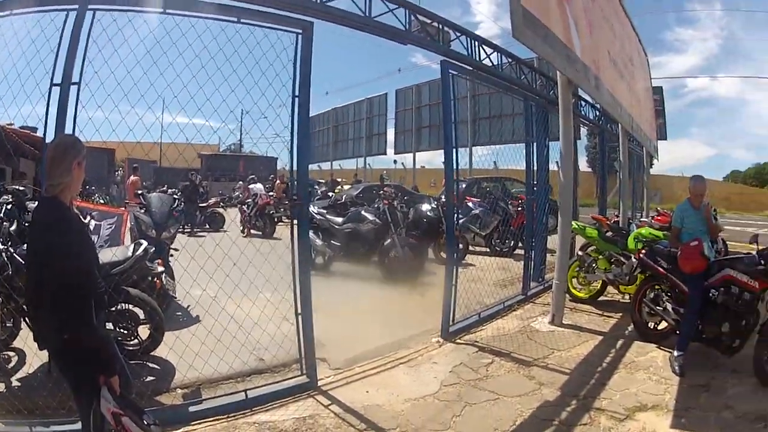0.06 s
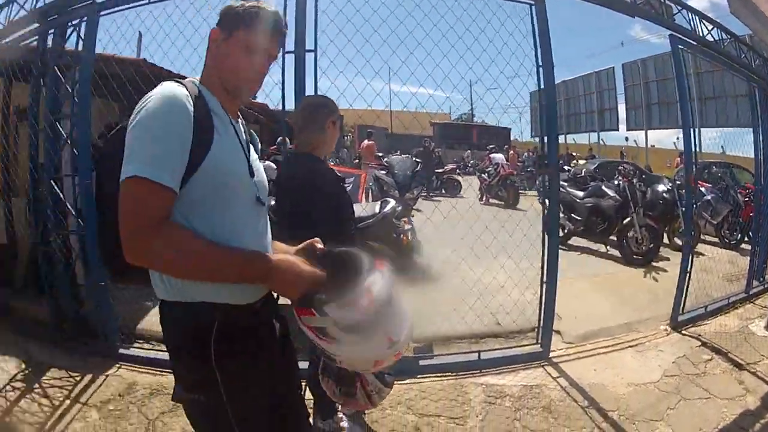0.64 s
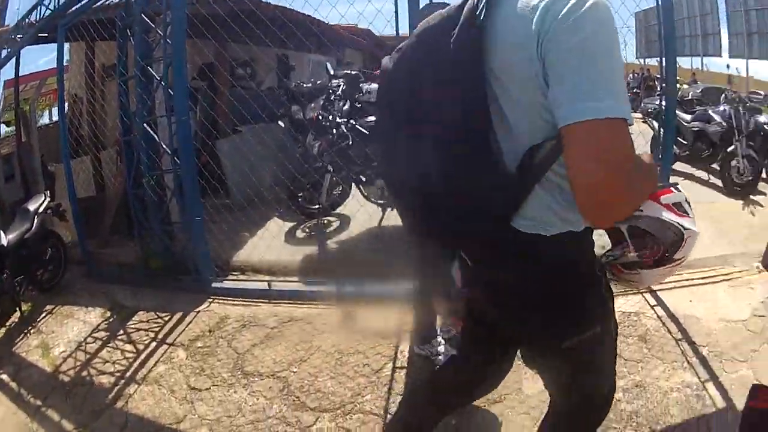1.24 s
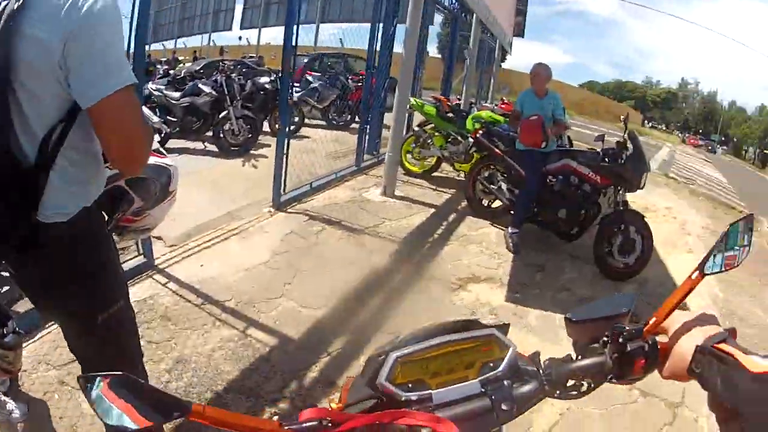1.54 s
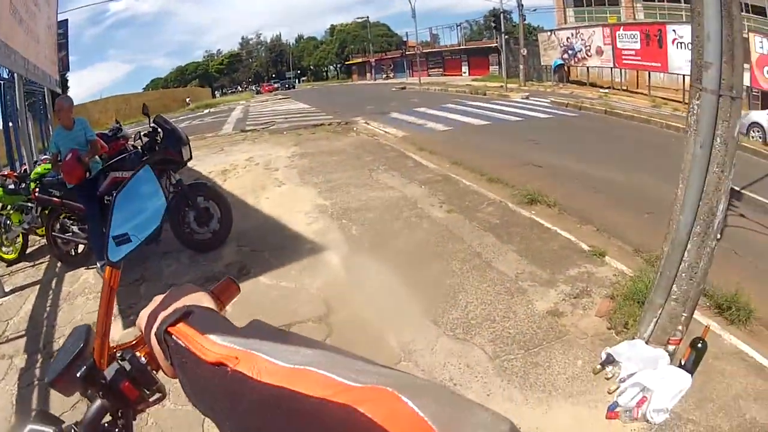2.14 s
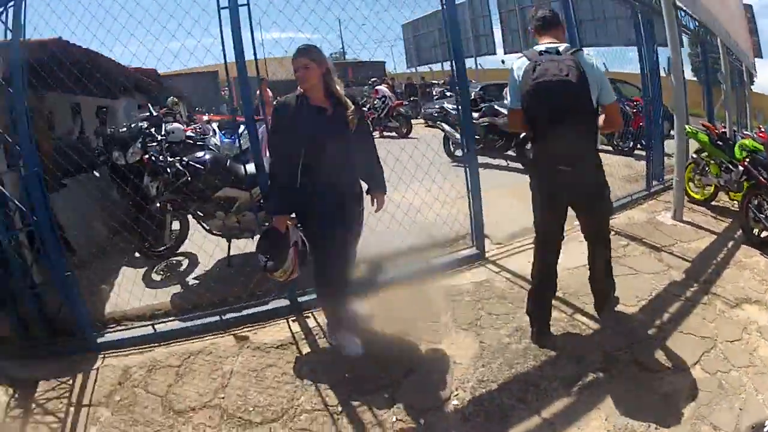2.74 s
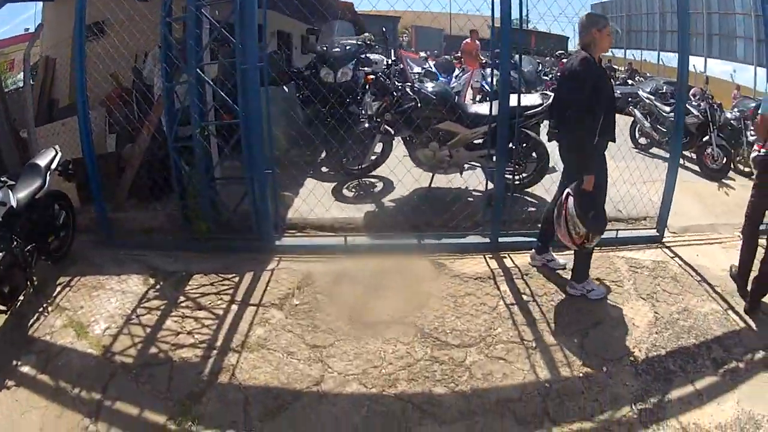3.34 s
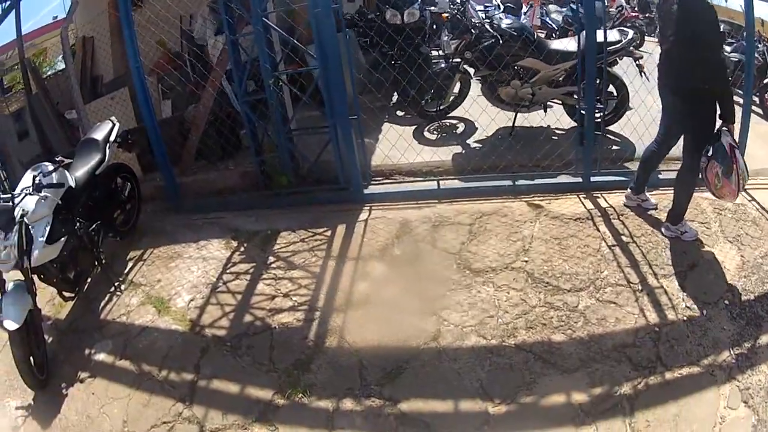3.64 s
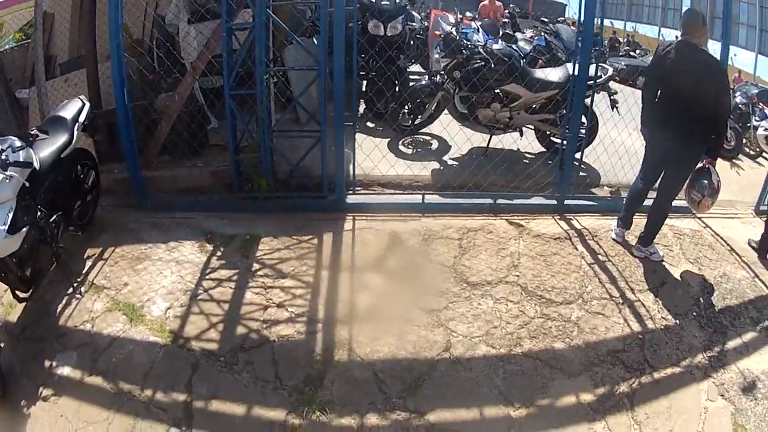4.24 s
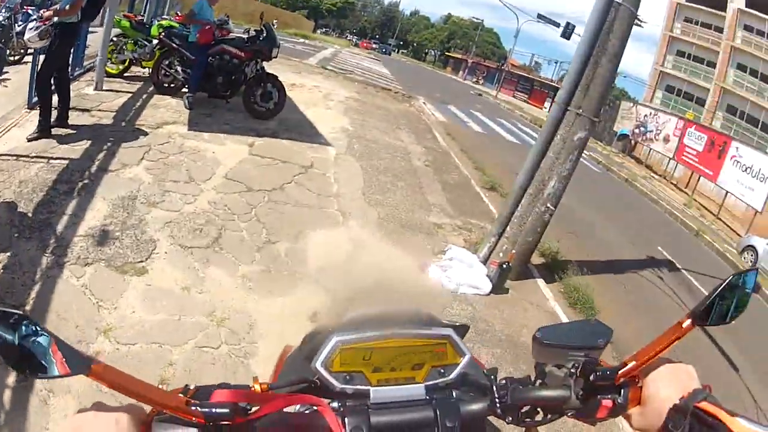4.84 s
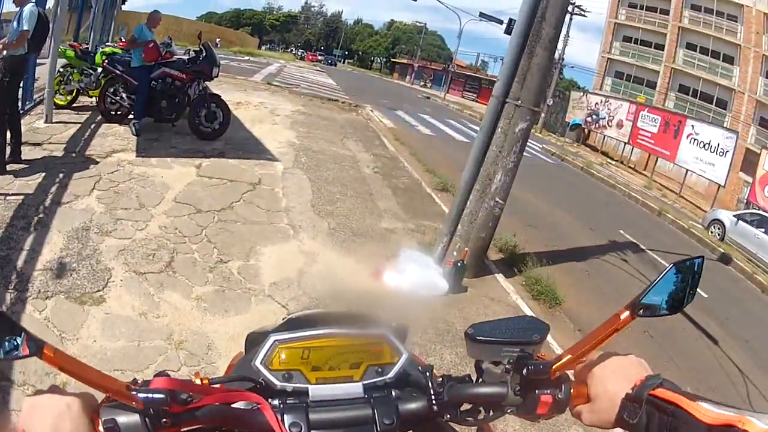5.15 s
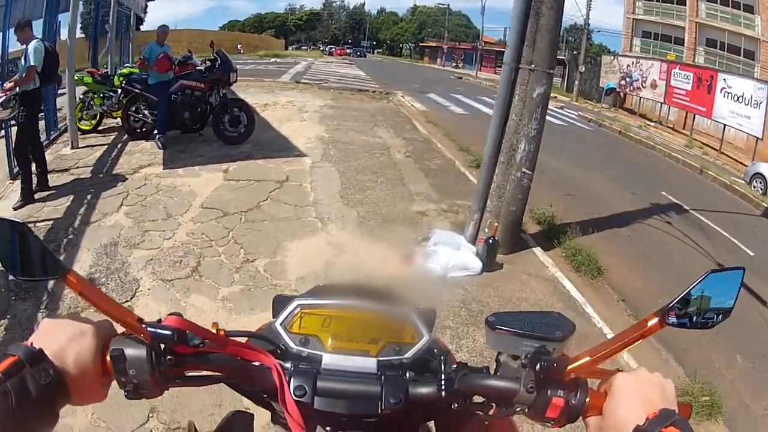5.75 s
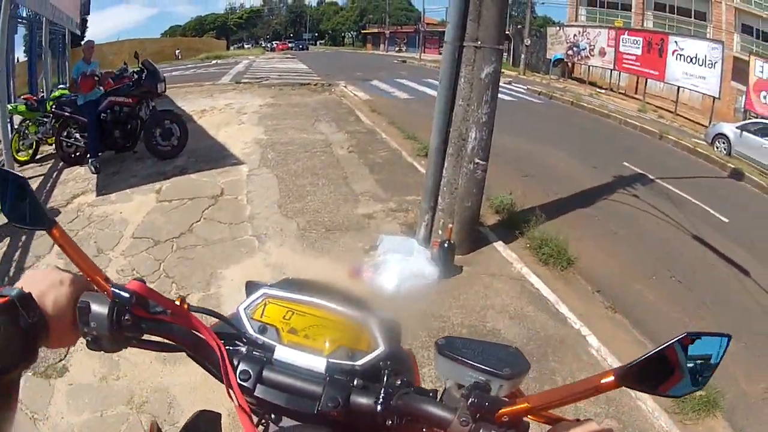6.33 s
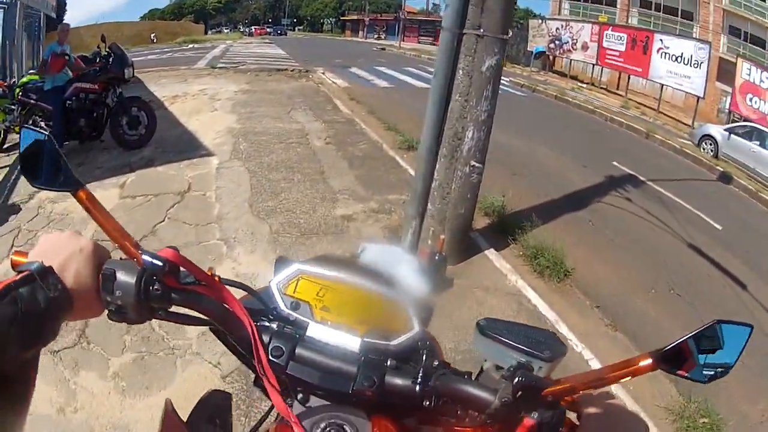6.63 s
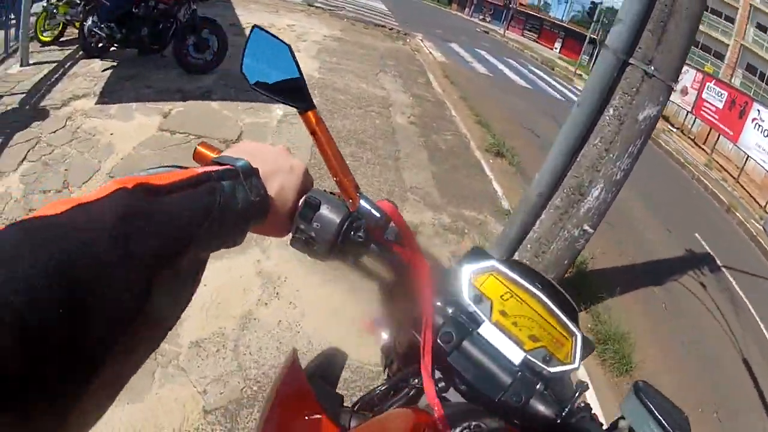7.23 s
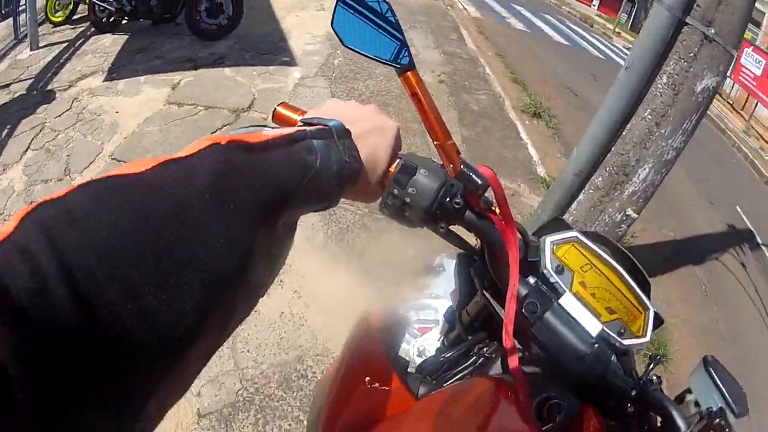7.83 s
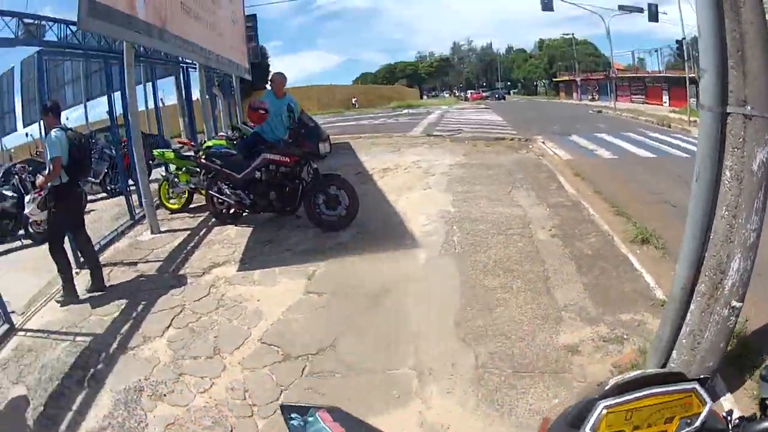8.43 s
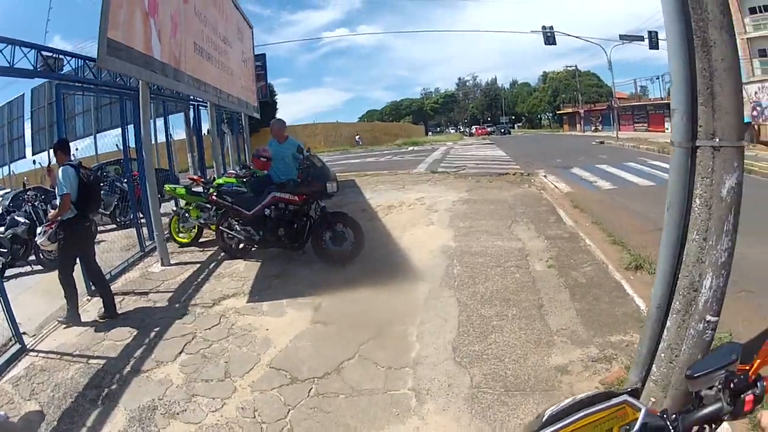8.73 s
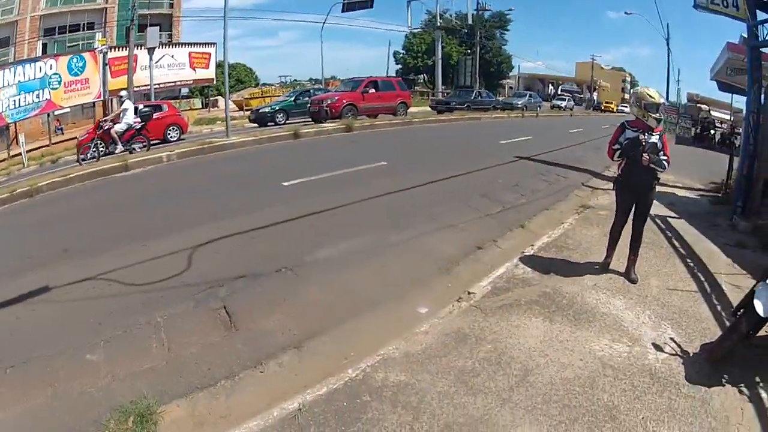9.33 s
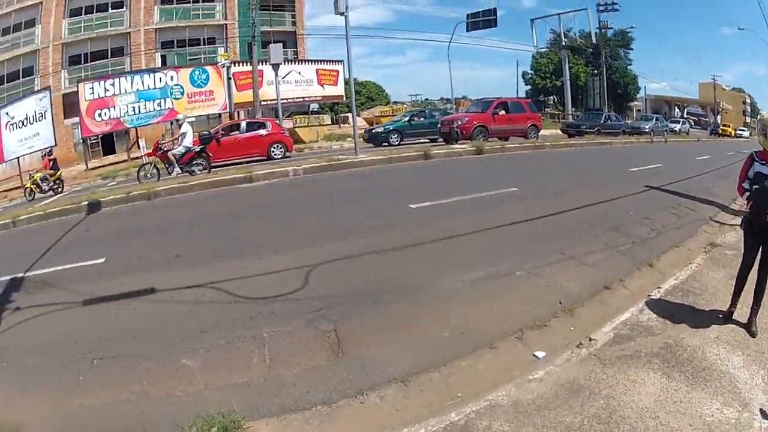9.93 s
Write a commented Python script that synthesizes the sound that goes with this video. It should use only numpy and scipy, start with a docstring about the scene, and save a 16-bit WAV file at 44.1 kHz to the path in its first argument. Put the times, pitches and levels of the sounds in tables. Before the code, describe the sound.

A four-cylinder motorcycle idles loudly with one throttle blip, then scrapes and thumps hit the microphone.

```python
"""An inline-four motorcycle idles through an open exhaust, with one blip of the throttle.
Each firing rings the pipe and drags a puff of gas; cam chain and tappets clatter and hiss.
A second bike hums nearby, under a faint whine. The tone shifts as the rider, who wears a
two-port microphone, looks around, and cloth brushes past it. After the blip something rubs
the microphone housing: it scrapes, thumps and covers the right port."""
import sys
import numpy as np
from scipy import signal
from scipy.fft import rfft, irfft, next_fast_len
from scipy.io import wavfile
from scipy.ndimage import map_coordinates

SR = 44100
rng = np.random.default_rng(int(sys.argv[2]) if len(sys.argv) > 2 else 0)


def master(y):
    """Save y as 16-bit WAV."""
    cut = np.clip(np.atleast_2d(y).T, -1, 1)
    pcm = np.round(cut * 32767)  # scale
    wavfile.write(sys.argv[1], SR, pcm.astype(np.int16))


N = 440118
T = np.arange(N) / SR

# Likeness of the two ports. Each row: frequency in Hz, correlation.
PORT_CORRELATION = [(30, 0.68), (100, 0.45), (400, 0.93), (1200, 0.9), (2500, 0.61), (5000, 0.049),
                    (15000, 0.09)]
# Idle speed. Each row: time in seconds, firings per second.
IDLE_HZ = [(0.0, 39.99), (1.42, 40.61), (1.76, 39.71), (2.98, 38.3), (3.48, 39.36), (3.62, 38.79),
           (3.92, 40.02), (4.54, 40.2), (4.68, 39.25), (5.5, 39.78), (5.68, 38.32), (6.5, 38.28),
           (6.68, 39.22), (7.14, 39.64), (7.24, 38.82), (9.18, 39.73), (9.32, 38.94), (9.98, 39.7)]

# Exhaust layers as the rider moves and looks around. Each row: time in seconds, gain in dB.
BOOM_DB = [(0, -17), (.5, -18), (1.2, -18.5), (1.8, -17.5), (2.5, -17.5), (3.2, -19.5), (4.2, -17.5),
           (5.7, -18), (6.3, -18.5), (6.8, -17), (8.0, -18.5), (8.6, -17), (9.3, -18.5), (9.98, -17.5)]
DRONE_DB = [(0, -18.5), (.35, -20), (1.4, -19), (2.3, -21), (4.2, -17.5), (7.1, -19.5), (7.9, -22),
            (8.8, -19), (9.98, -19.5)]
BARK_DB = [(0, -24), (1.25, -19), (1.55, -23.5), (2.0, -19.5), (3.3, -19.5), (4.4, -19.5), (4.75, -21.5),
           (5.6, -20), (6.1, -19.5), (6.4, -16.5), (7.1, -22), (7.4, -21.5), (8.92, -23.5), (9.07, -16),
           (9.35, -16), (9.98, -19)]
HOOT_DB = [(0, -6), (.6, -5), (1.05, -20.5), (1.65, -7.5), (2.2, -11), (2.85, -5), (3.4, -9.5), (4.1, -7),
           (4.6, -8), (4.9, -13.5), (5.6, -9), (5.78, -12), (6.0, -8.5), (6.2, -12.5), (6.6, -12),
           (7.1, -5), (7.7, -10), (8.9, -11.5), (9.98, -20.5)]  # within the bark
GROWL_DB = [(0, -6), (1.1, -7), (1.65, -10), (2.3, -5.5), (2.6, -11.5), (3.1, -10.5), (3.6, -7.5),
            (4.1, -4.5), (4.6, -6.5), (5.3, -9.5), (5.65, -16), (6.1, -15.5), (6.9, -19), (7.4, -10.5),
            (7.8, -12.5), (8.8, -10), (9.1, -14), (9.38, -10.5), (9.55, -5.5), (9.98, -4.5)]  # within the bark
SNARL_DB = [(0, -52), (.65, -42), (.98, -51), (1.25, -37), (1.5, -48.5), (3.3, -49), (3.5, -38),
            (3.75, -45.5), (4.4, -44.5), (4.7, -46), (5.68, -50), (5.78, -36.5), (5.87, -45), (6.03, -33),
            (6.15, -34), (6.25, -45), (8.9, -49.5), (9.1, -42), (9.3, -50), (9.98, -56)]
# Pipe drone. Each row: multiple of the firing rate, gain in dB, dB added at open throttle.
DRONE_ORDERS = [(1, -20, 12), (3, -3.5, 3.5), (4, -6.5, -2), (5, -16.5, -11), (6, -19, -13)]
# Close pair of pipe resonances. Each row: frequency in Hz, width in Hz, gain in dB.
GROWL_MODES = [(395.7, 67, -2.5), (425.9, 34.4, -7.5)]
# Lesser pipe resonances. Each row: frequency in Hz, width in Hz, gain in dB, dB added at open throttle.
LESSER_MODES = [(362.3, 56, -15.5, -7.5), (483.2, 41, -19.5, 1.5), (619.4, 41, -23.5, -6.5),
                (683.8, 49, -24.5, -8), (1216, 107, -35.5, 5.5)]
# Their tilt as the head turns. Each row: time in seconds, dB per octave about 400 Hz (flat above 650 Hz).
LESSER_TILT = [(0, 0), (.7, 6), (1., 4), (1.4, 5), (1.8, 7.5), (2.3, 6), (2.9, -5), (3.5, 2), (4.5, 3),
               (5.3, 0), (6, 0.5), (6.9, -2), (7.8, -7), (8.85, 6), (9.1, 14), (9.4, 1.5), (9.98, 18.5)]
# Harder exhaust pops. Each row: start in seconds, gain within the bark in dB.
POPS = [(1.066, 1), (1.285, 1)]

# Noise colours. Each row: frequency in Hz, relative density in dB.
PUFF_SPECTRUM = [(25, -9), (45, 0), (90, -2), (135, -9), (180, -1), (225, 2), (300, 1.5), (420, 0),
                 (480, -3.5), (700, -9), (950, -17.5), (1500, -55.5)]  # gas rushing out
RUMBLE_SPECTRUM = [(25, -12), (60, -10), (100, 2), (135, 4), (165, 1), (200, -6), (260, -32.5), (500, -62)]  # uneven burning
CLATTER_SPECTRUM = [(300, -44), (700, -2), (980, 5), (1270, 5.5), (1450, 3.5), (1800, 1.5), (2060, -7),
                    (2400, -4.5), (3300, -11), (4500, -32), (8000, -49.5)]  # valve gear and cam chain
HISS_SPECTRUM = [(1200, 8), (3300, 11), (5000, 8), (6500, 3), (9000, 0.5), (12000, -3), (14500, -24),
                 (15800, -37)]
TICK_SPECTRUM = [(1500, -16), (3200, -3), (4500, 7), (6500, -1), (9000, -2), (13000, -7), (15500, -22)]
BUZZ_SPECTRUM = [(1200, -15), (2300, 4), (3200, 4), (4200, -5), (5800, -8), (8000, -20), (14000, -32)]

# Engine cover resonances: low, whirr, top. Each row: frequency in Hz, width in Hz, gain in dB.
COVER_MODES = [(1310, 170, -6.5), (1680, 490, -5), (2049, 250, -9.5)]
# Clatter and its upper two resonances as the head turns. Each row: time in seconds, gain in dB.
CLATTER_DB = [(0, -35.5), (.9, -37), (1.95, -36), (2.23, -36.5), (2.53, -34), (2.8, -36.5), (3.05, -37),
              (3.55, -35), (4.6, -35.5), (5.1, -34.5), (6.7, -36), (7.8, -38), (8.5, -35), (8.9, -36.5),
              (9.1, -32.5), (9.45, -38), (9.98, -33.5)]
WHIRR_DB = [(0, -2), (.4, 4), (.75, -6), (1.0, -4), (1.5, 0), (1.72, 6.5), (2.05, 4.5), (2.3, 1.5),
            (2.55, 2.5), (3.0, -2), (3.4, -8.5), (4.6, -7), (5.15, 0.5), (5.9, 0.5), (6.3, -8), (6.75, 2.5),
            (7.0, -6), (8.8, 0), (9.4, -3.5), (9.98, 2)]
TOP_RING_DB = [(0, 2.5), (.6, 3.5), (1.1, -1), (1.7, 1), (2.2, -4), (2.6, 1), (3.1, -3), (4.1, 1.5),
               (5.5, 1.5), (6.2, 0), (7.6, -5), (9.1, 3), (9.98, 2)]
# Ground bounce of the clatter. Each row: time in seconds, extra path in metres.
GROUND_PATH_M = [(0, 0.84), (1.4, 0.906), (1.9, 1.82), (2.5, 1.46), (3.0, 0.93), (4.4, 0.86), (5.0, 1.17),
                 (5.6, 0.84), (7.5, 0.8), (8.6, 1.09), (9.2, 1.17), (9.98, 0.81)]
# Unevenness of the tappets. Each row: time in seconds, scatter in dB.
TAPPET_SCATTER_DB = [(0, 7.5), (3.4, 7.5), (4.4, 5), (5.8, 5), (6.1, 8), (8.9, 6), (9.4, 8)]
# Stray engine ticks. Each row: start in seconds, relative level in dB.
TICKS = [(0.0762, -34), (0.1105, -29), (0.1994, -36), (0.6973, -33), (0.7976, -37), (0.946, -31),
         (1.4631, -30), (1.5634, -34), (1.5868, -35), (2.1924, -32), (2.9432, -33), (3.1507, -34),
         (3.3578, -37), (9.3227, -37), (9.5537, -36), (9.7074, -35)]
# Brief dips of the whole engine sound. Each row: centre in seconds, depth in dB.
ENGINE_DIPS = [(1.0, 2), (2.87, 2), (3.86, 1.5), (7.37, 4.5), (7.85, 2.5), (9.22, 2.5), (9.38, 2),
               (9.76, 1.5)]

# Hum of the second bike. Each row: multiple of its firing rate, gain in dB.
SECOND_BIKE_ORDERS = [(4, -33.5), (5, -30.5), (6, -48)]
# Second bike as the rider turns. Each row: time in seconds, gain in dB.
SECOND_BIKE_DB = [(0, 7.5), (1.1, -3), (1.4, 4.5), (3.1, 2.5), (3.6, -3.5), (5.7, -3), (6.6, -3),
                  (8.7, 0.5), (9.1, -2), (9.98, 0)]
# Thin whine. Each row: frequency in Hz, level in dB.
WHINE_TONES = [(7193, -77), (10789, -75.5), (14385, -83)]

# Cloth strokes. Each row: start in seconds, length in seconds, level in dB, lean to the right in dB.
RUSTLES = [(3.468, 0.13, -44.5, 0), (7.2, 0.46, -46, 8.5), (8.97, 0.25, -43, 1)]
# Scrapes on the housing. Each row: start in seconds, length in seconds, level at the right port in dB.
SCRAPES = [(6.377, 0.009, -14), (6.499, .005, -34), (6.55, 0.022, -35), (6.717, 0.021, -26),
           (7.156, 0.007, -16.5), (7.163, 0.013, -22), (7.2485, 0.009, -13), (7.261, 0.005, -18),
           (7.829, 0.006, -25), (7.924, 0.015, -22), (7.993, .018, -38), (8.047, 0.017, -30),
           (8.104, .008, -31), (8.118, 0.028, -27), (8.221, 0.03, -34), (8.264, 0.023, -34),
           (8.3405, 0.005, -14), (8.362, 0.006, -28)]
# Thumps as the port seals and opens. Each row: start in seconds, signed pressure, time scale in ms,
# share at the left port, share that rebounds.
THUMPS = [(6.378, 3.5, 0.71, 0.11, 0.25), (6.385, 1.3, .8, .1, 0), (6.4127, -1.96, 1, 0.3, 0.02),
          (6.4985, -.17, 1, .2, 0), (6.5361, -0.4, .33, .1, 0), (6.7209, .85, .7, .1, 0),
          (6.7345, .4, .7, .1, 0), (7.1627, 3.5, 0.21, 0.022, 0.97), (7.173, 0.7, 0.36, 0.046, 0.025),
          (7.2579, 1.5, 1.6, .12, 0), (7.2639, 3, 0.12, 0.11, 0.036), (7.2651, 0.7, 1.6, 0.75, 0),
          (7.7501, 0.55, 0.7, 0.12, 0.22), (7.7877, -1.4, 0.82, 0.5, 0.025), (7.8038, 0.22, 0.6, 1, 0),
          (7.815, -.22, .8, .7, 0), (7.8222, -0.27, .9, 1, 0), (7.9304, -2, 0.58, 0.22, 0.85),
          (7.9381, 0.9, 1.1, .3, 0), (7.9875, -1.63, 1.1, 0.38, 0.073), (8.0367, -0.26, 0.8, .52, 0),
          (8.1006, .33, 0.9, .11, 0), (8.2754, 0.6, 1.4, 0.057, 0.4), (8.359, -.6, 1.1, 0.23, 0),
          (8.3629, .4, .7, .1, 0), (8.3643, 0.3, 1, .2, 0)]
# Right port covered. Each row: start in seconds, end of hold in seconds, bass loss in dB,
# release in seconds.
PORT_COVERINGS = [(6.38, 6.514, 17.5, 0.1), (7.24, 7.7, 19.5, 0.54), (7.8, 8.085, 13, 0.24)]


def amp(db):
    """Decibels to gain."""
    return 10 ** (np.asarray(db) / 20)


def unit_rms(x):
    """Scales to rms 1."""
    return x / np.sqrt(np.mean(x ** 2) + 1e-20)


def curve(rows):
    """A time table, sample by sample."""
    return np.interp(T, *np.transpose(rows))


def at_hz(spectrum, hz):
    """Interpolates on a log-frequency axis."""
    table_hz, value = np.transpose(spectrum)
    return np.interp(np.log(hz + 1), np.log(table_hz + 1), value)


def add(mix, start_s, sound):
    """Mixes a sound in, in place."""
    part = mix[..., max(round(start_s * SR), 0):][..., :sound.shape[-1]]
    part += sound[..., :part.shape[-1]]


def colour(x, spectrum, size=8192):
    """Minimum-phase filter with the given spectrum."""
    log_gain = np.log(amp(at_hz(spectrum, abs(np.fft.fftfreq(size, 1 / SR)))))
    taps = np.fft.ifft(np.exp(np.conj(signal.hilbert(log_gain)))).real[:size // 2]
    return signal.oaconvolve(np.atleast_2d(x), taps[None], axes=1)[:, :N]


def port_noise(spectrum, envelope=1):
    """Coloured noise at both ports, rms 1, least alike in the treble."""
    size = next_fast_len(N)
    left, other = rfft(rng.standard_normal((2, size)))
    alike = np.clip(at_hz(PORT_CORRELATION, np.fft.rfftfreq(size, 1 / SR)), 0, 1)
    white = irfft([left, alike * left + np.sqrt(1 - alike ** 2) * other], size)[:, :N]
    return unit_rms(colour(white * envelope, spectrum))


def drift(rate_hz, count=2000):
    """Smooth random wander, rms 1."""
    coarse_s = T[::16]
    wander = map_coordinates(rng.standard_normal(count), [coarse_s * rate_hz], order=2, mode="wrap")
    return unit_rms(np.interp(T, coarse_s, wander))


def panned(x, right_db):
    """Leans a sound to the right."""
    return x * amp(np.array([[-right_db], [right_db]]) / 2)


def dip_db(centre_s, depth_db, half_s=.05):
    """A bell-shaped loss."""
    return -depth_db * np.exp(-((T - centre_s) / half_s) ** 2)


def firing_rate_hz(open_s=5.68, shut_s=6.09, blip_hz=16.5, rev_up_s=.11, run_down_s=.17):
    """The idle hunts slightly; the blip revs up quickly and runs down more slowly."""
    opened_s = np.clip(T - open_s, 0, shut_s - open_s)
    blip = (1 - np.exp(-opened_s / rev_up_s)) * np.exp(-np.maximum(T - shut_s, 0) / run_down_s)
    return curve(IDLE_HZ) + .1497 * drift(5) + blip_hz * blip


def firings(cycles, uneven_db=.9, scatter_db=1.1, jitter_s=.0001):
    """One pulse a firing, the cylinders unequal; also their strength as an envelope."""
    onsets = np.flatnonzero(np.diff(np.floor(cycles))) + 1
    scatter, jitter = rng.standard_normal((len(onsets), 2)).T
    cylinder_db = uneven_db * np.cos(np.pi * np.arange(len(onsets)) / 2)
    strength = amp(cylinder_db + scatter_db * np.minimum(scatter, 1))
    pulses = np.zeros(N)
    pulses[np.clip(onsets + np.round(jitter_s * SR * jitter).astype(int), 0, N - 1)] = -strength
    return pulses, np.interp(np.arange(N), onsets, strength)


def boom(cycles):
    """Exhaust tone at twice the firing rate; drops out while the housing is pressed."""
    tone = -np.sqrt(2) * np.cos(4 * np.pi * cycles + .12 * drift(25))
    return tone * amp(curve(BOOM_DB) + dip_db(6.52, depth_db=13, half_s=.075) + drift(32))


def drone(cycles, throttle):
    """Low firing harmonics in the pipe, steadier at open throttle."""
    wander = 1 - .9 * throttle
    tone = np.zeros(N)
    for order, db, open_db in DRONE_ORDERS:
        gain = amp(db + open_db * throttle + 2 * wander * drift(20))
        tone -= gain * np.cos(2 * np.pi * round(order) * cycles + .09 * order * wander * drift(20))
    return tone * amp(curve(DRONE_DB) - .5 * throttle)


def resonance(x, hz, width_hz, throttle, heat_rise=.02):
    """A steep pipe resonance, rms 1; hot gas under throttle raises its pitch."""
    carrier = np.exp(2j * np.pi * np.cumsum(hz * (1 + heat_rise * throttle)) / SR)
    pole = np.exp(-np.pi * width_hz / SR)
    return unit_rms((carrier * signal.lfilter([1], [1, -2 * pole, pole * pole], x / carrier)).imag)


def pipe(drive, throttle, hoot_hz=279.4, hoot_width_hz=41):
    """The pipe rings: a hollow hoot, a growl above it, and lesser resonances."""
    def wavering(note, waver_s):
        return np.interp(T + waver_s * (1 - throttle / 2) * drift(16), T, note)

    hoot = wavering(resonance(drive, hoot_hz, hoot_width_hz, throttle), .00017)
    growl = sum(wavering(resonance(drive, hz, width_hz, throttle), .0004) * amp(db)
                for hz, width_hz, db in GROWL_MODES)
    lesser = np.zeros(N)
    for hz, width_hz, db, open_db in LESSER_MODES:
        tilt_db = curve(LESSER_TILT) * np.log2(min(hz, 650) / 400)
        lesser += resonance(drive, hz, width_hz, throttle) * amp(db + open_db * throttle + tilt_db)
    return growl * amp(curve(GROWL_DB)) - hoot * amp(curve(HOOT_DB)) + wavering(lesser, .00017)


def exhaust(firing_hz, cycles, lead_cycles=.15, echo_s=.0071):
    """Each firing rings the pipe and drags a puff of gas, over boom, rumble and drone."""
    throttle = np.clip((firing_hz - 40.5) / 6.5, 0, 1) ** .7
    pulses, strength = firings(cycles + lead_cycles)
    tones = boom(cycles) + drone(cycles, throttle)
    gas_flow = 1 + np.exp(-(cycles % 1) / 1.1)
    puffs = port_noise(PUFF_SPECTRUM, gas_flow * strength) * amp(-8 - 9 * throttle)
    rumble = port_noise(RUMBLE_SPECTRUM, gas_flow) * amp(-31.5 - 2.6 * throttle)
    pipe_echoes = .3 * np.interp(T - echo_s, T, pulses) + .08 * np.interp(T - 2 * echo_s, T, pulses)
    pulses = unit_rms(pulses + pipe_echoes)
    gust = np.exp(-((cycles + lead_cycles) % 1) / .45)
    turbulence = unit_rms(gust * rng.standard_normal(N)) * (1 - throttle / 2)
    bark = pipe(pulses + .47 * turbulence, throttle) + puffs + pops()
    bark *= amp(curve(BARK_DB) + 8.5 * throttle)
    snarl = resonance(pulses + turbulence, hz=828.6, width_hz=74, throttle=throttle)
    return tones + rumble + panned(bark + snarl * amp(curve(SNARL_DB)), right_db=1.5)


def valve_clatter():
    """Valve gear and cam chain rattle and ring the engine covers."""
    rattle = amp(1.1 * drift(130))
    clatter = port_noise(CLATTER_SPECTRUM, rattle)
    swells_db = [2.3 * np.tanh(drift(3.7)), curve(WHIRR_DB), curve(TOP_RING_DB)]
    for (hz, width_hz, db), swell_db in zip(COVER_MODES, swells_db):
        band = signal.butter(2, [hz - width_hz / 2, hz + width_hz / 2], "band", fs=SR)
        drive = rattle * (rng.standard_normal(N) + .21 * rng.standard_normal((2, N)))
        clatter += unit_rms(signal.lfilter(*band, drive)) * amp(db + swell_db)
    return unit_rms(ground_bounce(clatter)) * amp(curve(CLATTER_DB) - 1)


def ground_bounce(x, share=.42, sound_m_per_s=343):
    """The reflected path changes as the rider moves, sweeping a comb at each port."""
    delay_s = curve(GROUND_PATH_M) / sound_m_per_s
    return np.array([port + share * np.interp(T - delay_s * (1 + .03 * drift(3)), T, port) for port in x])


def tappet_hiss(cycles, level_db=-50, follow_share=.71):
    """Two uneven taps a firing pulse a hiss that partly follows the clatter's level."""
    scatter_db = curve(TAPPET_SCATTER_DB) * np.tanh(drift(74) / 2) * 2
    taps = np.exp(-((2 * cycles) % 1) / .31) * amp(scatter_db)
    clatter_db = curve(CLATTER_DB)
    hiss_db = level_db + follow_share * (clatter_db - clatter_db.mean())
    return port_noise(HISS_SPECTRUM, 1 + .83 * taps) * amp(hiss_db)


def second_bike(firing_hz=33.8):
    """Firing harmonics of a rough, slower idle further off."""
    cycles = np.cumsum(firing_hz + .7 * drift(4)) / SR
    hum = sum(amp(db + 3 * drift(16)) * np.sin(2 * np.pi * round(order) * cycles + .8 * drift(18))
              for order, db in SECOND_BIKE_ORDERS)
    return hum * amp(curve(SECOND_BIKE_DB))


def whine():
    """Faint high tones that flutter slightly."""
    return sum(amp(db + 2 * drift(17)) * np.sqrt(2) * np.sin(2 * np.pi * hz * T + .5 * drift(13))
               for hz, db in WHINE_TONES)


def ticks(gain_db=10, ring_s=.0007, ring_share=.13):
    """Crisp clicks of metal, each with a very short ring."""
    out, t = np.zeros((2, N)), T[:SR // 200]
    for start_s, db in TICKS:
        ring = ring_share * rng.standard_normal((2, len(t))) * np.exp(-t / ring_s)
        add(out, start_s, amp(db + gain_db) * ((t == 0) + ring))
    return colour(out, TICK_SPECTRUM)


def pops(decay_s=.0062):
    """Harder pops in the exhaust: short bursts of dull noise."""
    envelope = np.zeros(N)
    for start_s, db in POPS:
        add(envelope, start_s, amp(db) * np.exp(-T[:900] / decay_s))
    return envelope * port_noise([(150, -38), (400, 28), (1000, 16), (3000, -28)])


def rustle():
    """Cloth brushes near the ports with a grainy hiss."""
    grain = amp(3.1 * drift(440, count=5000))
    hiss = port_noise([(800, 3.5), (3000, -2.5), (7000, -9), (14500, -15), (16000, -21)], grain)
    out = np.zeros((2, N))
    for start_s, length_s, db, right_db in RUSTLES:
        stroke = hiss[:, round(start_s * SR):][:, :round(length_s * SR)]
        add(out, start_s, panned(stroke, right_db) * amp(db) * signal.windows.tukey(stroke.shape[1], .5))
    return out


def buzz(start_s=4.156, length_s=.095, rate_hz=80, decay_s=.0024, gain_db=-40):
    """A loose part rasps in a quick run of taps."""
    taps = np.zeros(N)
    for tap_s in np.arange(start_s, start_s + length_s, 1 / rate_hz):
        add(taps, tap_s, 2 * np.exp(-T[:SR // 50] / decay_s))
    return port_noise(BUZZ_SPECTRUM) * taps * amp(gain_db)


def scrapes(slip_hz=900, scatter_db=4.5, hiss_share=.09, left_share=.16):
    """Stick-slip on the housing: bursts of one-sided spikes."""
    slip_count = np.cumsum(slip_hz * np.exp(.6 * drift(700))) // SR
    slipping = np.diff(slip_count, prepend=0) > 0
    slips = slipping * amp(scatter_db * rng.standard_normal(N)) + hiss_share * rng.standard_normal(N)
    spikes = signal.lfilter(*signal.butter(1, [180, 1100], "band", fs=SR), slips)
    out = np.zeros((2, N))
    for start_s, length_s, db in SCRAPES:
        burst = spikes[round(start_s * SR):][:round(length_s * SR)]
        burst = unit_rms(burst * signal.windows.tukey(len(burst), .5))
        add(out, start_s, np.outer([left_share, 1], amp(db) * burst))
    return out


def thumps(rebound_s=.0049):
    """Pressure steps at the port leak away with an undershoot; a hard contact bounces once."""
    out, t = np.zeros((2, N)), T[:SR // 40]
    for start_s, pressure, scale_ms, left_share, rebound_share in THUMPS:
        age = t / (scale_ms / 1000)
        roughness = 1 + .028 * rng.standard_normal(len(t))
        step = pressure * (1 - .48 * age) * np.exp(-.58 * age) * roughness
        thump = np.outer([left_share, 1], step)
        add(out, start_s, thump)
        add(out, start_s + rebound_s, rebound_share * thump)
    return out


def cover_right_port(x, seal_s=.021, leak_hz=52, split_hz=600):
    """The right port always leaks a little bass; covered, it is quieter, most of all in the bass."""
    loss_db = np.zeros(N)
    for start_s, end_s, depth_db, release_s in PORT_COVERINGS:
        sealed = np.clip(np.minimum((T - start_s) / seal_s, 1 - (T - end_s) / release_s), 0, 1)
        loss_db = np.maximum(loss_db, depth_db * sealed)
    right = signal.lfilter(*signal.butter(1, leak_hz, "high", fs=SR), x[1]) * amp(.7)
    bass = signal.lfilter(*signal.butter(1, split_hz, fs=SR), right)
    return np.array([x[0], bass * amp(-loss_db) + (right - bass) * amp(-.7 * loss_db)])


def scene():
    """Both bikes at the two ports, plus contact noise on the housing."""
    firing_hz = firing_rate_hz()
    cycles = np.cumsum(firing_hz) / SR  # one cycle a firing
    engine = exhaust(firing_hz, cycles)
    engine += panned(valve_clatter() + tappet_hiss(cycles) + ticks() + buzz(), right_db=1)
    engine *= amp(sum(dip_db(centre_s, depth_db) for centre_s, depth_db in ENGINE_DIPS))
    return cover_right_port(engine + second_bike() + whine()) + thumps() + scrapes() + rustle()


def record(dry, cutoff_hz=15700):
    """The thumps overload at full scale; a low-pass follows."""
    low_pass = signal.firwin(255, cutoff_hz, window=("kaiser", 9), fs=SR)
    return signal.oaconvolve(np.clip(dry, -1, 1), low_pass[None], "same")


dry = scene()
out = record(dry)
master(out)
```